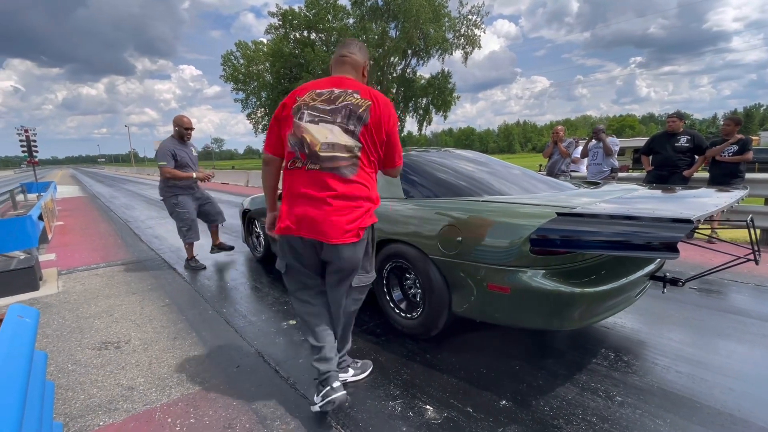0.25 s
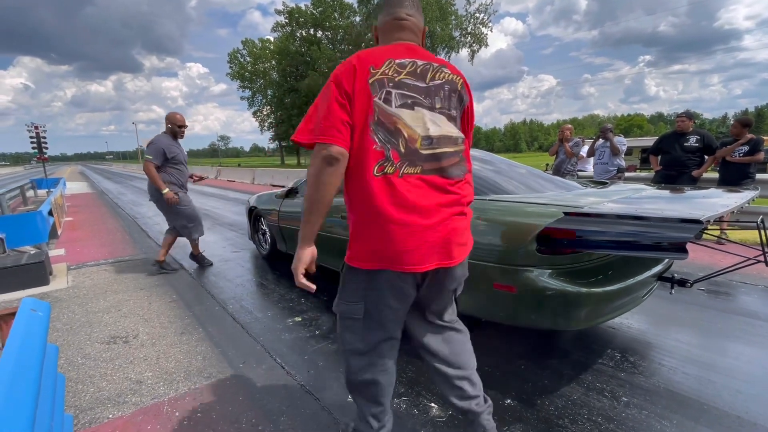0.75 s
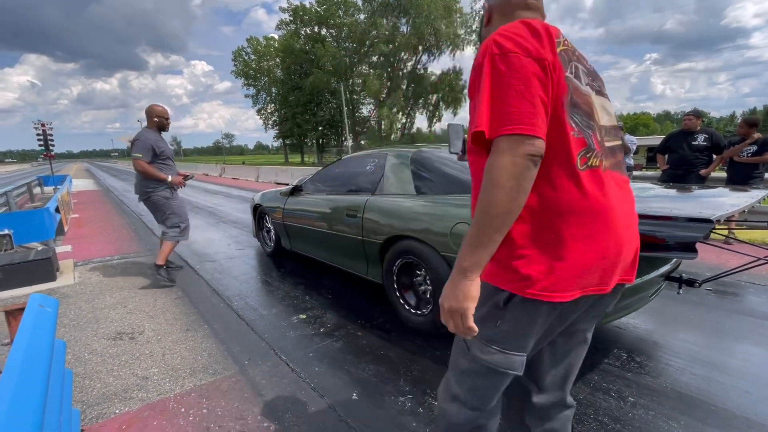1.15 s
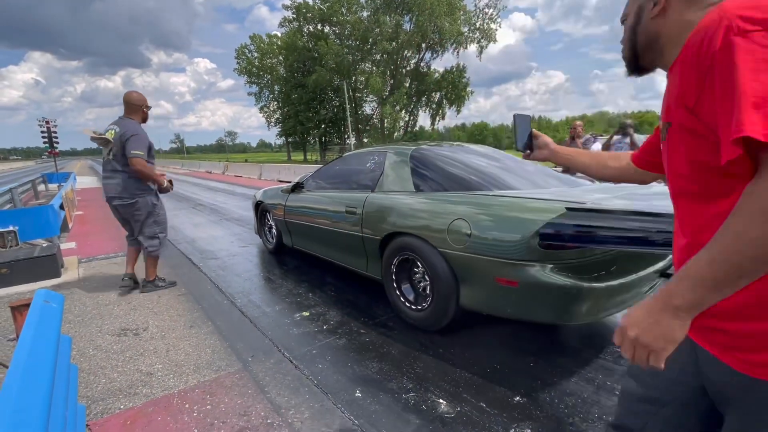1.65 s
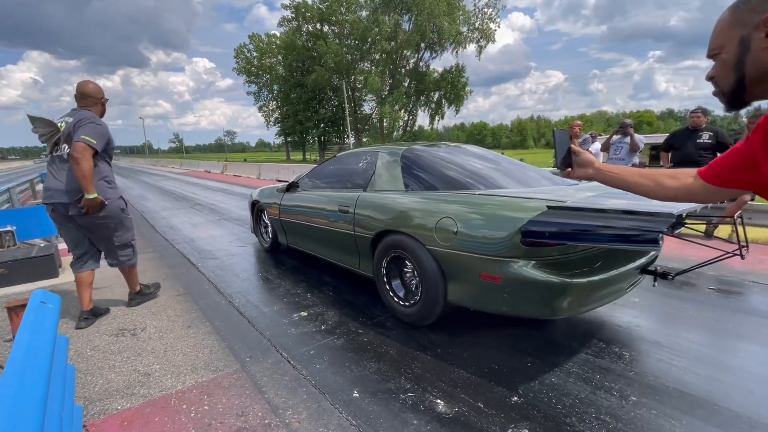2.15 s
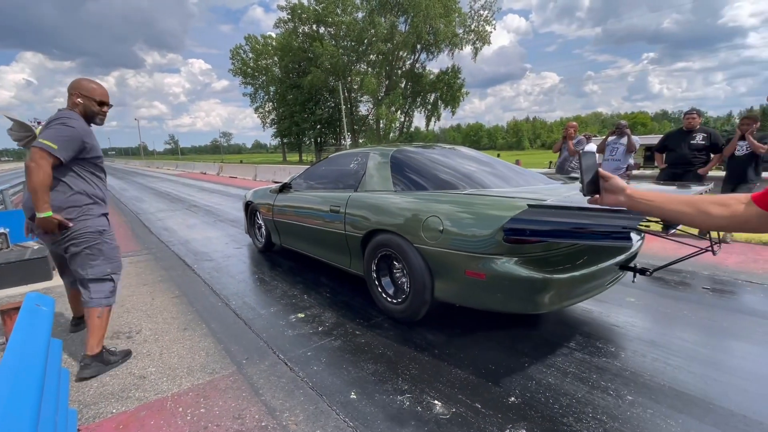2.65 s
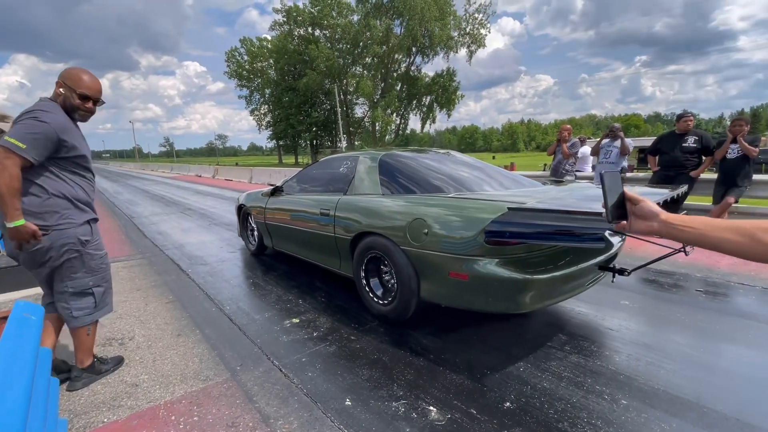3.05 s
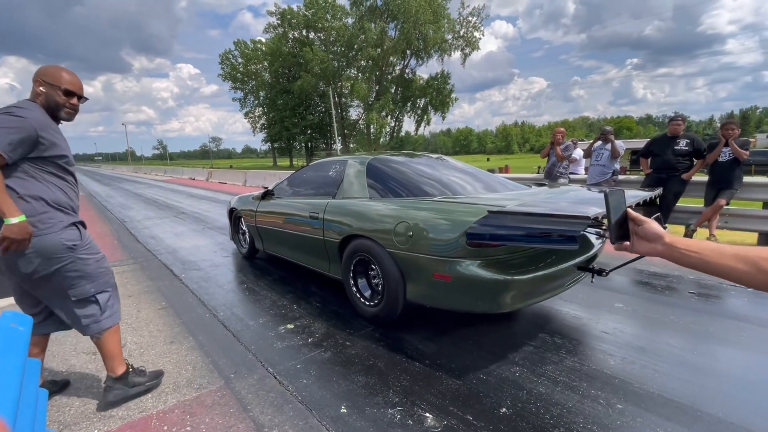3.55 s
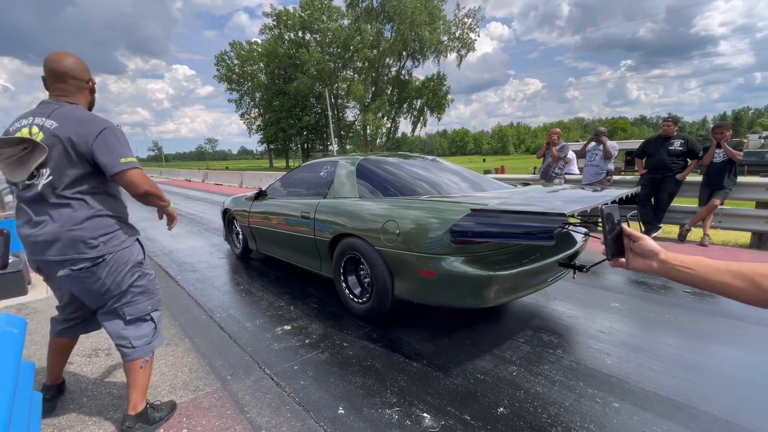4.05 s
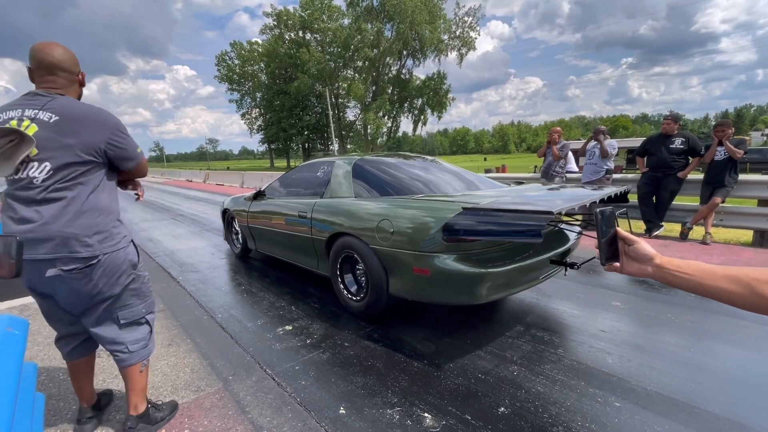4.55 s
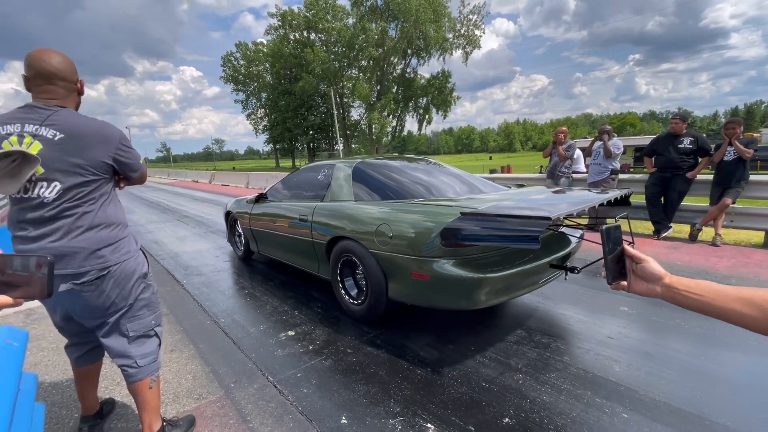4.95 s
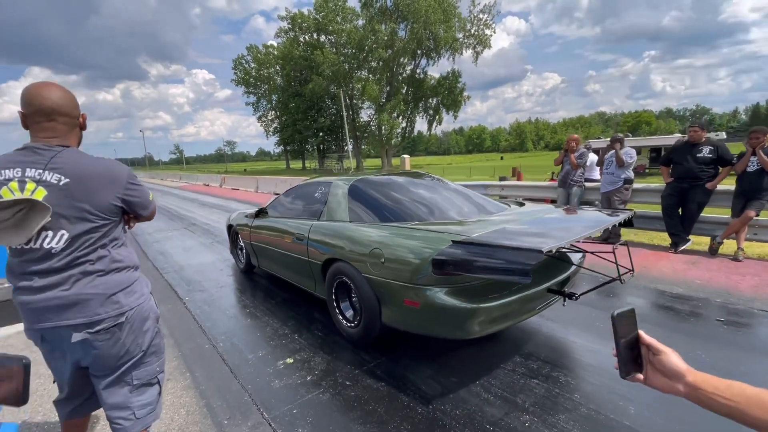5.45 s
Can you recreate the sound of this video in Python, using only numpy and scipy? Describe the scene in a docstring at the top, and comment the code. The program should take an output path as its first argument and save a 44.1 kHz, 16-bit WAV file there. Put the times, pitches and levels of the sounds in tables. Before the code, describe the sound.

Outdoors at a drag strip, a big V8 with open exhausts idles with a lumpy, uneven lope. After about a second it picks up into loud, ragged barking, each bark a crack, hollow knock, rasp and deep thump. It holds there to the end, heard close in stereo with short slaps off guard walls.

```python
"""A big V8 drag car with a wild cam and open exhausts stands on the line, loping at idle and then held at a
fast, ragged idle. Weak firings thud in resonant pipes; strong ones bark: a crack of coloured noise, a rasping
tail, a knock of throat tones that rings the collectors, and a deep thump of delayed slugs of gas.
Soft pumping and a drone lie beneath, guard walls slap the upper sound back, and a stereo microphone hears it."""
import sys
import numpy as np
from scipy import signal
from scipy.fft import rfft, irfft, next_fast_len
from scipy.io import wavfile
from scipy.ndimage import uniform_filter1d

SR = 44100
rng = np.random.default_rng(int(sys.argv[2]) if len(sys.argv) > 2 else 0)


def wav_record(signal):
    """Record a signal, one row per channel, as 16-bit PCM in the file named by sys.argv[1]."""
    frames = np.transpose(np.atleast_2d(signal))
    bounded = np.clip(frames, -1, 1)
    # unit amplitude maps onto the largest positive 16-bit level
    quanta = np.round(bounded * 32767).astype(np.int16)
    wavfile.write(sys.argv[1], SR, quanta)


N = 250929
CUTOFF_HZ = 16000
TIME = np.arange(N) / SR
SIZE = next_fast_len(N, True)
BINS = np.maximum(np.fft.rfftfreq(SIZE, 1 / SR), 1)  # frequencies [Hz]

# strong firings: (time [s], crack [dB], crack rise [s], rasp [dB], knock [dB], thump [dB])
BARKS = [(0.016, -32, 0.0021, -23.5, -27, -26), (0.027, -23.5, 0.0033, -26, -18, -16.5),
         (0.099, -27, 0.009, -23, -38, -38), (0.109, -20.5, 0.0051, -22.5, -19.5, -16.5),
         (0.198, -34, 0.0057, -24, -37, -21), (0.295, -32.5, 0.0088, -26.5, -40, -20.5),
         (0.381, -34, 0.0033, -24.5, -36, -20.5), (0.448, -25, 0.0053, -22.5, -32, -25),
         (0.546, -27.5, 0.0051, -25, -28.5, -23.5), (0.637, -31, 0.00096, -25.5, -57, -29),
         (0.694, -28, 0.0029, -25, -33, -24), (0.709, -27, 0.0053, -34, -45, -25),
         (0.79, -35, 0.0099, -25, -40, -33), (0.827, -27, 0.0022, -24, -32, -34),
         (0.863, -33, 0.0016, -16.5, -24.5, -16.5), (0.91, -20, 0.0046, -24.5, -22.5, -17.5),
         (0.978, -33, 0.0027, -25, -35.5, -18), (0.985, -19.5, 0.0044, -25, -26, -18),
         (1.064, -26, 0.0031, -22.5, -44, -24), (1.108, -19.5, 0.0023, -15.5, -23, -11),
         (1.153, -42.0, 0.00063, -26.0, -40.0, -18), (1.179, -14.5, 0.0024, -16, -17, -16.5),
         (1.203, -19, 0.0039, -35, -21, -33), (1.234, -16, 0.0028, -14, -13, -13),
         (1.265, -14.5, 0.0019, -23, -17, -13), (1.292, -21, 0.0023, -14.5, -13, -13),
         (1.335, -11.5, 0.003, -19, -21, -10.5), (1.366, -18.5, 0.0019, -21, -15.5, -15),
         (1.423, -23, 0.0053, -34, -22, -16), (1.461, -25, 0.002, -23, -26, -18.5),
         (1.481, -25, 0.0028, -23, -27, -15), (1.49, -12.5, 0.0018, -18, -40.0, -12.5),
         (1.521, -12.5, 0.0022, -18, -17, -13.5), (1.567, -14, 0.0027, -21.5, -15.5, -11.5),
         (1.632, -26, 0.0015, -18.5, -43, -13.5), (1.672, -18, 0.0014, -17.5, -24, -10.5),
         (1.704, -28.5, 0.0039, -37, -28, -29), (1.736, -12, 0.0031, -18, -14, -14),
         (1.768, -21.5, 0.0033, -39, -19.5, -15), (1.804, -35, 0.002, -20.5, -40, -12.5),
         (1.844, -17, 0.0019, -29, -22, -16.5), (1.875, -13.5, 0.0039, -29, -20.5, -15),
         (1.907, -12, 0.0036, -28, -15.0, -25), (1.939, -14, 0.0015, -16, -15, -13),
         (2.01, -15, 0.0049, -16.5, -19, -13), (2.068, -21, 0.002, -17, -26, -12),
         (2.074, -13, 0.0042, -25, -16.5, -23), (2.129, -15, 0.0034, -23, -15, -16),
         (2.186, -15, 0.0022, -19, -19, -15), (2.198, -15, 0.003, -16, -15.5, -15),
         (2.242, -28.0, 0.0026, -24, -40.0, -22), (2.256, -11, 0.0027, -17, -22, -13),
         (2.301, -35, 0.0062, -23, -28, -11), (2.333, -26, 0.0064, -21.5, -26, -18.5),
         (2.364, -13.5, 0.0026, -21, -22.5, -14), (2.398, -16.0, 0.003, -18, -14.5, -13.5),
         (2.429, -17, 0.0053, -21.5, -18, -17.5), (2.464, -19, 0.002, -16.5, -16.5, -12),
         (2.528, -32, 0.0051, -24.5, -32, -16), (2.586, -28, 0.0026, -18.5, -42, -14),
         (2.626, -15, 0.0024, -18, -28, -15.5), (2.692, -16.5, 0.0038, -24.5, -16, -16),
         (2.751, -13, 0.0032, -17, -15.5, -12.5), (2.807, -19, 0.0036, -14, -21, -13.5),
         (2.822, -14.5, 0.0017, -17.5, -15.5, -12.5), (2.864, -42, 0.0022, -20, -37, -21),
         (2.871, -14, 0.0023, -39, -16, -15), (2.982, -18, 0.004, -24, -20, -15),
         (3.036, -36, 0.006, -24.5, -35, -19), (3.059, -17, 0.0019, -18.0, -21, -13.5),
         (3.113, -25.5, 0.006, -20.5, -27, -17.5), (3.146, -23.5, 0.0051, -26, -24, -19),
         (3.177, -19, 0.0027, -14.5, -17, -13.5), (3.188, -15.5, 0.0033, -19, -20, -17.5),
         (3.228, -28, 0.0034, -23, -38, -21), (3.243, -17.5, 0.0034, -18.5, -12.5, -16.5),
         (3.287, -29, 0.0044, -23.5, -24, -14.5), (3.318, -25.5, 0.0046, -29, -31, -17.5),
         (3.347, -17.5, 0.0032, -24.5, -17, -18.5), (3.38, -14.5, 0.0053, -27, -20, -14.5),
         (3.411, -16.5, 0.0034, -30, -14, -33), (3.444, -15, 0.0032, -30, -13.5, -24),
         (3.51, -33, 0.0046, -23.5, -29, -17.5), (3.574, -25.5, 0.0044, -24.5, -23, -14.5),
         (3.604, -16.5, 0.0031, -21, -15.5, -20), (3.654, -43, 0.0029, -22.5, -38, -20),
         (3.672, -14, 0.0036, -21.5, -17.5, -24), (3.707, -14, 0.0023, -17.5, -18, -12.5),
         (3.777, -19.5, 0.006, -16, -17, -14), (3.817, -16.5, 0.003, -19.5, -22, -15),
         (3.847, -15.5, 0.0047, -16.5, -15.5, -13.5), (3.879, -19.5, 0.0036, -17, -16, -13.5),
         (4.001, -36, 0.0021, -19.0, -37, -15), (4.043, -17, 0.0035, -19.5, -14.5, -20.5),
         (4.114, -14, 0.0034, -22.5, -15.5, -19), (4.17, -16.5, 0.0049, -18, -21, -16.5),
         (4.228, -14.5, 0.0012, -17.5, -23, -14), (4.24, -14, 0.0016, -19, -17, -17.5),
         (4.289, -13, 0.0031, -22.5, -14, -19.5), (4.357, -25, 0.0032, -24, -40, -18.5),
         (4.392, -28, 0.003, -21.5, -30, -17.5), (4.401, -18.5, 0.0017, -19.5, -34, -21.5),
         (4.459, -24, 0.0035, -19, -34, -15.5), (4.468, -13, 0.002, -31, -17, -24),
         (4.523, -19.5, 0.0019, -16, -16, -17), (4.581, -20, 0.0024, -16.5, -17.5, -13.5),
         (4.592, -18.5, 0.0044, -17, -16, -12), (4.642, -13, 0.003, -23, -14, -17),
         (4.749, -22, 0.0072, -17.5, -36, -12.5), (4.811, -22, 0.0059, -19, -26, -11.5),
         (4.824, -16, 0.0043, -18, -15.5, -26), (4.882, -15.5, 0.0049, -23.5, -18, -14.5),
         (4.936, -19, 0.005, -18, -17, -10), (4.95, -15, 0.0029, -39, -16.5, -27),
         (4.993, -31, 0.0054, -22.5, -42, -12.5), (5.002, -14.5, 0.0039, -21.5, -16, -20),
         (5.107, -15.5, 0.0027, -24, -20.5, -15.5), (5.163, -24, 0.0021, -17.5, -26, -13.5),
         (5.174, -17.5, 0.0045, -24, -15.5, -19), (5.229, -21, 0.0076, -31, -26.5, -17.5),
         (5.284, -24, 0.0049, -16, -17, -12.5), (5.299, -15, 0.0034, -34, -18, -41),
         (5.337, -31, 0.006, -20.5, -22, -14.5), (5.349, -16.5, 0.0036, -19, -16.5, -27),
         (5.395, -36, 0.0063, -25, -26, -18.5), (5.455, -18.5, 0.0035, -21.5, -19, -15),
         (5.489, -18, 0.0034, -16.5, -22, -16.5), (5.522, -18, 0.0054, -23, -16, -15.5),
         (5.555, -17.5, 0.0019, -17.5, -12.5, -15), (5.62, -31, 0.006, -25, -27, -16),
         (5.673, -44, 0.0021, -21, -26.5, -18)]
# uneven push of the eight cylinders in firing order: level [dB]
CYLINDER_PUSH = [3.5, -1.5, -2.5, 4, 1.5, -19, -1, -2.5]
# low resonances of the exhaust pipes, before the heat factor: (frequency [Hz], width [Hz], level [dB])
PIPE_MODES = [(63.5, 12.3, 11.5), (74, 12, -12.5), (96.3, 8.6, -3.5), (118.6, 4.7, -6.5), (164.8, 21, -6),
              (217.3, 10.5, -2), (233.7, 4.7, -7)]
# ring of the collectors, before the pitch factor: (frequency [Hz], width [Hz], level [dB])
COLLECTOR_MODES = [(383, 39, -10), (339, 40, -12), (406, 24, -11), (661, 43, -4), (740, 31, -4.5),
                   (803.4, 15.4, 5), (909, 22, 1.5), (1199, 28, -1.5), (1317, 24, -4.5)]
# colour of the gas in the crack: (frequency [Hz], level per Hz [dB])
CRACK_COLOUR = [(250, -45), (550, 4), (820, -8), (1080, -6.5), (1350, 4), (1900, -9), (2700, -9.5),
                (3400, -3), (4600, -13), (6300, -5), (8000, -11), (9500, -6.5), (11500, -10), (14000, -42)]
# colour of the gas in the rasp: (frequency [Hz], level per Hz [dB])
RASP_COLOUR = [(200, -14.5), (400, 6), (490, -4.5), (850, 4), (1080, -3), (1400, -4), (1900, -3),
               (2700, -3), (3400, -3.5), (4600, -8.5), (6300, -13), (8200, -12.5), (11300, -18.5),
               (14000, -41)]
# how alike the two sides are: (frequency [Hz], correlation [-1 to 1])
LIKENESS = [(300, 0.83), (800, 0.72), (1500, 0.87), (2500, 0.26), (5000, 0.05), (8000, 0.48), (10000, 0.35),
            (12000, 0.36)]
# left minus right: (frequency [Hz], level difference [dB])
BALANCE = [(100, 20), (500, 3), (1000, 2), (2200, -3.5), (3300, 2), (7000, 4.5), (9500, 5.5)]
# speed of sound in the pipes, which follows the heat of the gas: (time [s], factor [ratio])
HEAT = [(0, 0.92), (0.598, 0.9), (0.898, 1.02), (1.349, 1.11), (1.8, 0.995), (2.701, 0.96), (3.402, 1.015),
        (4.3, 0.93), (5.69, 1.035)]
# narrow resonances of the pipe mouths and the underbody: (frequency [Hz], width [Hz], boost [dB])
MOUTH_MODES = [(2086, 49, 4), (2286, 60, 3.5), (2700, 68, 3), (3320, 130, 2.5), (5966, 290, 5.5),
               (6730, 1600, 4.5), (9200, 850, 8), (12250, 1500, 8)]
# crank speed, before the firings are aligned to the hard barks: (time [s], speed [turns/s])
CRANK_SPEED = [(0, 22.4), (.8, 25.7), (1.05, 26.5), (1.3, 36.6), (1.6, 39.8), (2, 32.6), (2.7, 33),
               (3, 32.7), (4.3, 31.4), (5.69, 32.3)]
# how hard the engine works, as the gas flow between barks: (time [s], hiss [dB], rumble [dB])
EFFORT = [(0.0, -38.5, -16.5), (0.301, -51, -26), (0.6, -47.5, -28), (0.799, -49, -24), (1.05, -37, -19.5),
          (1.3, -29.5, -15.5), (1.55, -45.5, -20.5), (1.9, -28.5, -15), (2.15, -45, -19), (2.45, -54, -17),
          (2.7, -41, -16), (2.95, -49, -21), (3.15, -40.5, -17.5), (3.45, -30, -16), (3.75, -45.5, -18.5),
          (3.97, -39.5, -17.5), (4.2, -31.5, -14), (4.5, -55, -19.5), (4.72, -43.5, -18.5),
          (4.9, -33.5, -20.5), (5.3, -37, -19.5), (5.69, -52, -23)]
# tones of the collector throats, before the pitch factor: (frequency [Hz], level [dB])
THROAT_TONES = [(830, 0), (1330, -4.5)]
# pitch of the collectors and their throats: (time [s], factor [ratio])
RING_PITCH = [(0, 1.02), (.4, 1.1), (.75, 1.086), (1.3, 1.03), (2, 1.03), (3.3, 0.991), (4.5, .99),
              (5.69, 0.93)]
# pipe tones that keep sounding between barks: (frequency [Hz], idle level [dB], fast-idle level [dB])
PUMPING_TONES = [(60.1, -27.5, -29), (222, -39.5, -31)]


def from_db(db):
    """Decibels to gain."""
    return 10 ** (np.asarray(db) / 20)


def rms_one(x):
    """Scale to unit power."""
    return x / np.sqrt(np.mean(x ** 2) + 1e-20)


def at_hz(points):
    """A table read at every frequency, on a log axis."""
    hz, value = np.transpose(points)
    return np.interp(np.log(BINS), np.log(hz), value)


def over_time(points):
    """A (time, value) table read at every sample."""
    return np.interp(TIME, *np.transpose(points))


def cut(x, hz, kind, order=2):
    """Butterworth low-, high- or band-pass."""
    return signal.sosfilt(signal.butter(order, hz, kind, fs=SR, output="sos"), x + 1e-18)


def later(x, s):
    """Delay by s seconds."""
    return np.interp(TIME - s, TIME, x, left=0)


def clicks(times, sizes):
    """One impulse at each time."""
    samples = np.abs(np.round(times * SR)).astype(int)
    return np.bincount(samples, sizes, N)[:N]


def resonate(x, hz, width_hz):
    """A two-pole resonance with gain close to 1 on top."""
    r = np.exp(-np.pi * width_hz / SR)
    feed = np.array([1, 0, -1]) * (1 - r * r) / 2
    feedback = [1, -2 * r * np.cos(2 * np.pi * hz / SR), r * r]
    return signal.lfilter(feed, feedback, x + 1e-18)


def body(x, modes):
    """Parallel resonances; a unit impulse comes out with unit power over a fiftieth of a second."""
    def rings(v):
        return sum(from_db(db) * resonate(v, hz, width) for hz, width, db in modes)
    energy = np.sum(rings(signal.unit_impulse(SR // 4)) ** 2)
    return rings(x) * np.sqrt(SR / 50 / energy)


def pipes(flow, pitch, modes):
    """Faster sound makes pipes ring higher: the ringing runs on a clock that follows the pitch factor."""
    clock = np.cumsum(pitch)
    ticks = np.arange(int(clock[-1]))
    rung = body(np.interp(ticks, clock, flow), modes)
    return np.interp(clock, ticks, rung)


def trackside(x, near_s=0.012, far_s=.033, near_db=-15, far_db=-16):
    """Slaps off the guard walls on either side of the lane: two delayed copies without bass."""
    left, right = cut(x, 390, "high")
    # each slap reaches one ear slightly before the other
    near = np.array([later(left, near_s), later(right, near_s + 0.00051)])
    far = np.array([later(left, far_s + 0.000264), later(right, far_s)])
    return x + from_db(near_db) * near + from_db(far_db) * far


def pumping(waver=0.02237, opens_s=1.0):
    """Soft pumping holds two pipe tones on wavering pitches; their levels change as the throttle opens."""
    out = np.zeros(N)
    for hz, idle_db, fast_db in PUMPING_TONES:
        pitch_hz = hz * (1 + waver * rms_one(cut(rng.standard_normal(N), 9.2, "low")))
        level_db = np.interp(TIME, [opens_s, opens_s + 0.25], [idle_db, fast_db])
        out += from_db(level_db) * rms_one(np.sin(2 * np.pi * np.cumsum(pitch_hz) / SR))
    return out


def firings(turns, jitter_s, uneven_db, lag_s=0.002475):
    """Four pulses per crank turn, uneven by cylinder and by chance, their count aligned to the hard barks."""
    phase = np.cumsum(turns) * 4 / SR
    hard_s = [s for s, *_, knock_db, _ in BARKS if knock_db > -22]
    due = np.interp(hard_s, TIME, phase)
    # bend the count so that it is whole at every hard bark
    whole = np.cumsum(np.round(np.diff(due, prepend=0)))
    phase = phase + np.interp(TIME, hard_s, whole - due)
    k = np.arange(int(phase[-1]))
    chance = rng.standard_normal((N // 200, 2))[k]
    push_db = np.array(CYLINDER_PUSH)[k % len(CYLINDER_PUSH)]
    sizes = from_db(push_db + uneven_db * np.clip(chance[:, 0], -2, 2))
    times = np.interp(k, phase, TIME) + lag_s + jitter_s * chance[:, 1]
    return clicks(times, rms_one(sizes))


def drone(pulses, drone_db=-49):
    """The stream of firings keeps one low ring of the collectors going through a doubled resonance."""
    hz, width_hz, _ = COLLECTOR_MODES[0]
    ring = resonate(resonate(pulses, hz, 2 * width_hz), hz, 2 * width_hz)
    return from_db(drone_db) * rms_one(ring)


def pipe_boom(pulses, heat, rumble_db, first_s=0.00905, second_s=0.01907, lead_db=-8, thump_db=2,
              running_db=-5, churn=0.044, shallow_hz=78, top_hz=272):
    """Weak firings thud lightly in the pipes; a bark pushes at once, then sends two heavy slugs of gas."""
    s, *_, level_db = np.transpose(BARKS)
    chance = rng.standard_normal((len(s), 2))
    slugs = clicks(s + first_s + 0.00055 * chance[:, 0], from_db(level_db))
    slugs += clicks(s + second_s + 0.00089 * chance[:, 1], from_db(level_db - 5.0))
    slugs += clicks(s, from_db(level_db + lead_db))
    running = cut(pulses + churn * rng.standard_normal(N), shallow_hz, "high")
    flow = running * from_db(rumble_db + running_db) + from_db(thump_db) * slugs
    boom = cut(pipes(flow, heat, PIPE_MODES), top_hz, "low", order=9)
    boom = cut(boom, 42.4, "high", order=4)
    # the right side is a little shaded and later
    return np.array([boom, cut(boom, 490, "low", order=1)])


def bark_shapes(rise_s=0.009, rasp_t60=0.15):
    """Envelopes of the short crack and of the rasp that dies away behind it; overlaps add as power."""
    crack, rasp = np.zeros((2, N))
    for s, crack_db, crack_s, rasp_db, _, _ in BARKS:
        start = int(s * SR)
        age = TIME[:min(N - start, SR // 4)]
        span = slice(start, start + len(age))
        snap = (age / crack_s * np.exp(1 - age / crack_s)) ** 0.86
        swell = 1 - np.exp(-age / rise_s)
        decay = np.exp(-np.log(1000) * age / rasp_t60)
        crack[span] += (from_db(crack_db) * snap) ** 2
        rasp[span] += (from_db(rasp_db) * swell * decay) ** 2
    return np.sqrt(crack), np.sqrt(rasp)


def patter(pulses, ring_pitch, hiss_db, patter_db=-6):
    """The ordinary firings tap the collectors too, harder while gas is flowing."""
    flow = np.hypot(bark_shapes()[1], from_db(hiss_db))
    return from_db(patter_db) * pipes(pulses * flow, ring_pitch, COLLECTOR_MODES)


def knock(ring_pitch, length_s=0.007, blow_s=0.0061, edge_s=0.00032, first_share=0.68, ring_db=-5,
          detune=0.029, vary_db=3.0):
    """Each bark sounds the throats for about five cycles of the low tone and leaves the collectors ringing."""
    out, age = np.zeros(N + SR), TIME[:SR // 10]
    blow = np.interp(age, [0, edge_s, blow_s, blow_s + 2 * edge_s], [0, first_share, 1, 0])

    def varied(db):
        return from_db(db + vary_db * rng.standard_normal())

    for s, *_, knock_db, _ in BARKS:
        start = int(s * SR)
        pitch = ring_pitch[start] * (1 + detune * rng.standard_normal())
        burst = blow * sum(varied(db) * np.sin(2 * np.pi * (hz * pitch * age + rng.random()))
                           for hz, db in THROAT_TONES)
        ring = sum(varied(db) * rms_one(resonate(burst, hz * pitch, width))
                   for hz, width, db in COLLECTOR_MODES)
        hit = rms_one(burst) + from_db(ring_db) * rms_one(ring)
        # every hit carries the energy of a unit-power sound length_s long
        hit *= np.sqrt(length_s * SR / np.sum(hit ** 2))
        out[start:start + len(hit)] += from_db(knock_db) * hit
    return out[:N]


def collectors(pulses, hiss_db, right_db=-2.5, lag_s=0.0002):
    """The hollow middle of the exhaust note; it reaches the right side later and weaker."""
    ring_pitch = over_time(RING_PITCH)
    ring = knock(ring_pitch) + patter(pulses, ring_pitch, hiss_db)
    ring = cut(cut(ring, 2770, "low", order=3), 290, "high")
    return np.array([ring, from_db(right_db) * later(ring, lag_s)])


def at_ports(noise, lead_s=0.00019):
    """Stereo spectrum of two unrelated noises at the microphone pair; the left side is reached first."""
    mid, side = rfft(rms_one(noise), SIZE)
    alike, sign = np.clip(at_hz(LIKENESS), -1, 1), np.array([[1], [-1]])
    lead = lead_s / (1 + (BINS / 3500) ** 4)  # the lead fades out in the treble
    pair = np.sqrt(1 + alike) * mid + sign * np.sqrt(1 - alike) * side
    return pair * from_db(sign * at_hz(BALANCE) / 2) * np.exp(1j * np.pi * sign * BINS * lead)


def turbulence(grain_db, patchy_db, count, size):
    """Spectrum of grainy stereo noise in count bands; its colour shifts over size points at even power."""
    white = rng.standard_normal((2, 2, N))
    edges = np.geomspace(1000, 13000, count + 1)
    patches = from_db(patchy_db * np.clip(rng.standard_normal((count, size)), -2, 2))
    # even out the power across neighbouring bands
    patches /= np.sqrt(uniform_filter1d(patches ** 2, size=count // 3, axis=0))
    noise = cut(white[1], edges[0], "low") + cut(white[0], edges[-1], "high")
    patch_times = np.linspace(0, TIME[-1], size)
    for k, patch in enumerate(patches):
        band = cut(white[k % 2], edges[k:k + 2], "band")
        noise += band * np.interp(TIME, patch_times, patch)
    flicker = rms_one(cut(rng.standard_normal(N), 1760, "low"))
    grains = from_db(grain_db * np.clip(flicker, -2.5, 2.5))
    return at_ports(noise * grains)


def crackle(gap_s, spread_db, smear_s=0.000508, count=12000):
    """Spectrum of small shock fronts that follow each other unevenly, each smeared by the pipe end."""
    times = np.cumsum(gap_s * rng.uniform(.3, 1.7, count))
    sizes = from_db(spread_db * np.clip(rng.standard_normal((2, count)), -2, 2))
    sizes = sizes * rng.choice([-1, 1], (2, count))
    inside = times < TIME[-1]
    fronts = np.array([clicks(times[inside], size[inside]) for size in sizes])
    # a delay that grows with frequency
    return at_ports(fronts) * np.exp(-2j * np.pi * smear_s * BINS ** 2 / CUTOFF_HZ)


def gas(noise, spectrum):
    """Turbulence coloured by the jet and the pipe mouths; rms 1."""
    mouths_db = sum(db / (1 + (2 * (BINS - hz) / width) ** 2) for hz, width, db in MOUTH_MODES)
    colour_db = at_hz(spectrum) + mouths_db
    return rms_one(irfft(noise * from_db(colour_db), SIZE)[:, :N])


def exhaust_gas(pulses, hiss_db, crack_db=-1.46, rasp_db=2.0, puff_s=0.024, steady=1.0,
                crack_pops_db=-4.0, rasp_pops_db=-4):
    """Gas tears out of the pipe ends: cracks of noise, and a rasp puffed by the firings, both crackling."""
    crack, rasp = bark_shapes()
    flow = np.hypot(rasp, from_db(hiss_db))
    puffs = signal.lfilter([1], [1, -np.exp(-1 / (puff_s * SR))], pulses)
    puffs = rms_one(steady + puffs)
    burst = turbulence(grain_db=2.5, patchy_db=9.0, count=24, size=300)
    burst = burst + from_db(crack_pops_db) * crackle(gap_s=.0012, spread_db=1.0)
    tail = turbulence(grain_db=1.5, patchy_db=9.5, count=42, size=190)
    tail = tail + from_db(rasp_pops_db) * crackle(gap_s=.0016, spread_db=0.5)
    crack_jet = from_db(crack_db) * crack * gas(burst, CRACK_COLOUR)
    rasp_jet = from_db(rasp_db) * flow * puffs * gas(tail, RASP_COLOUR)
    return crack_jet + rasp_jet


def scene():
    """The engine's firings and barks drive both the low boom and the bright upper sound."""
    s, *levels_db = np.transpose(EFFORT)
    hiss_db, rumble_db = [np.interp(TIME, s, db) for db in levels_db]
    pulses = firings(over_time(CRANK_SPEED), jitter_s=.0004, uneven_db=1.8)
    low = pumping() + drone(pulses) + pipe_boom(pulses, over_time(HEAT), rumble_db)
    upper = collectors(pulses, hiss_db) + exhaust_gas(pulses, hiss_db)
    return low + trackside(upper)


def record(dry, port_hz=10150, port_width_hz=1200, port_db=4, notch=0.97):
    """The microphone ports ring in opposite phase; peaks are rounded and the top is cut."""
    mid = dry.mean(axis=0)
    ports = resonate(resonate(mid, 10000, 2200), 10000, 2200)
    notched = dry - notch * resonate(mid, port_hz, port_width_hz)
    heard = notched + from_db(port_db) * ports * np.array([[1], [-1]])
    rounded = heard / (1 + (heard / .9) ** 4) ** .25
    softened = cut(rounded, 14500, "low", order=3)
    return signal.sosfilt(signal.ellip(10, .1, 90, CUTOFF_HZ, fs=SR, output="sos"), softened)


dry = scene()
out = record(dry)
wav_record(out)
```